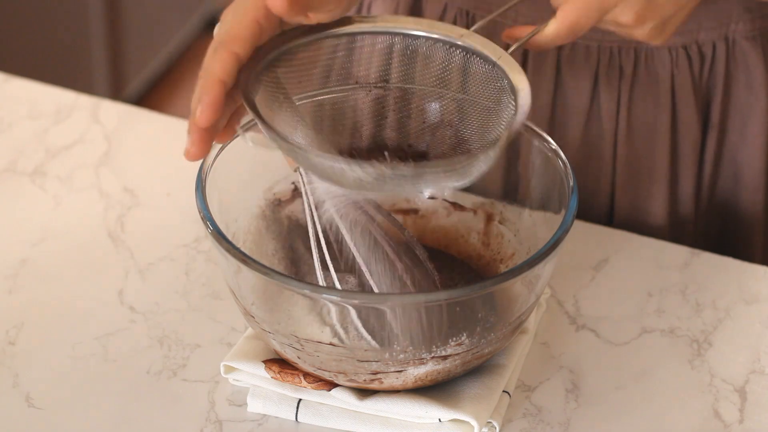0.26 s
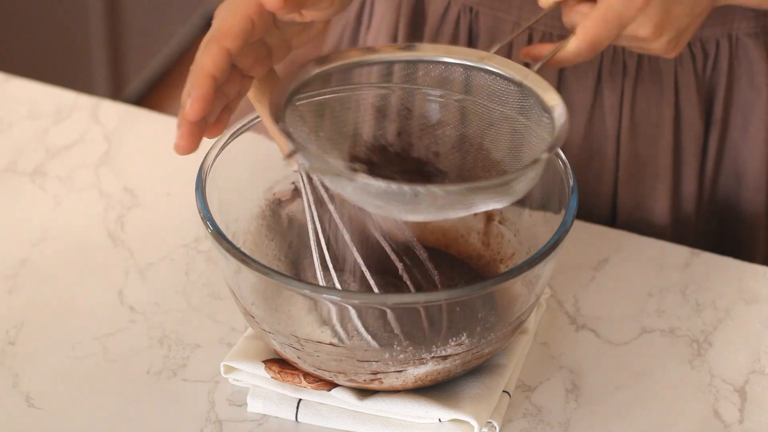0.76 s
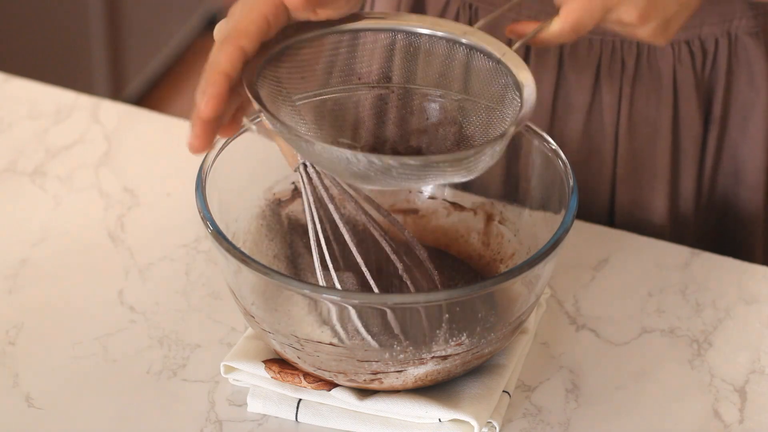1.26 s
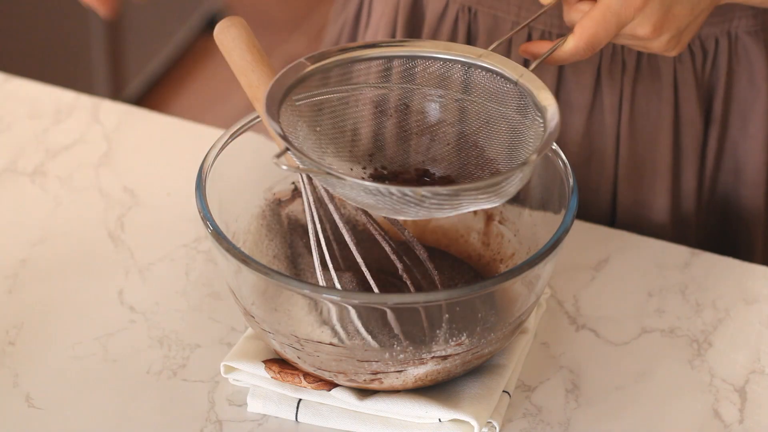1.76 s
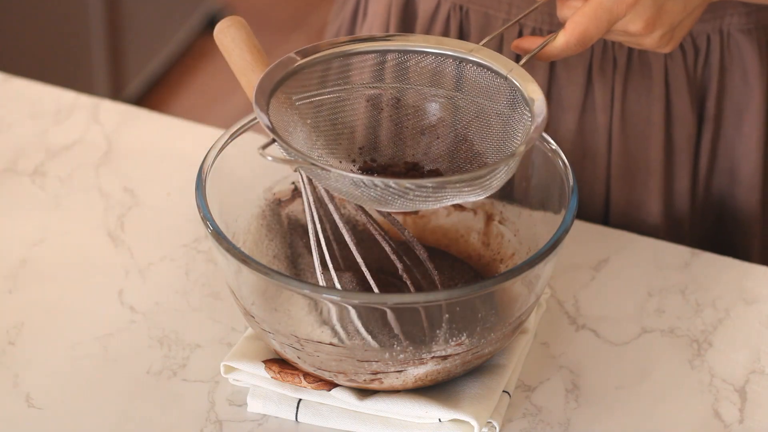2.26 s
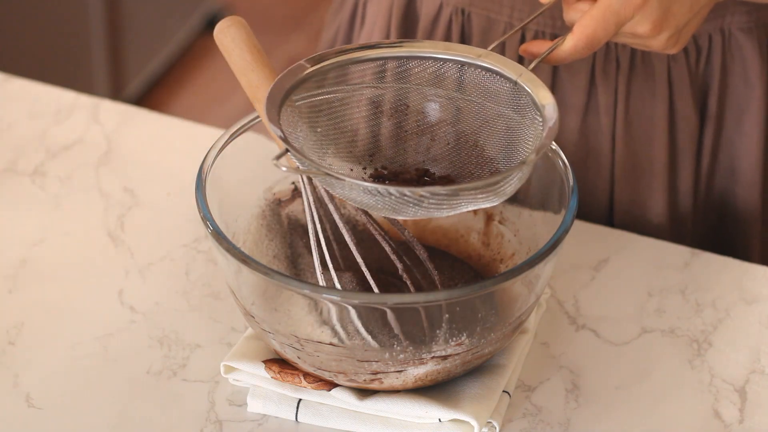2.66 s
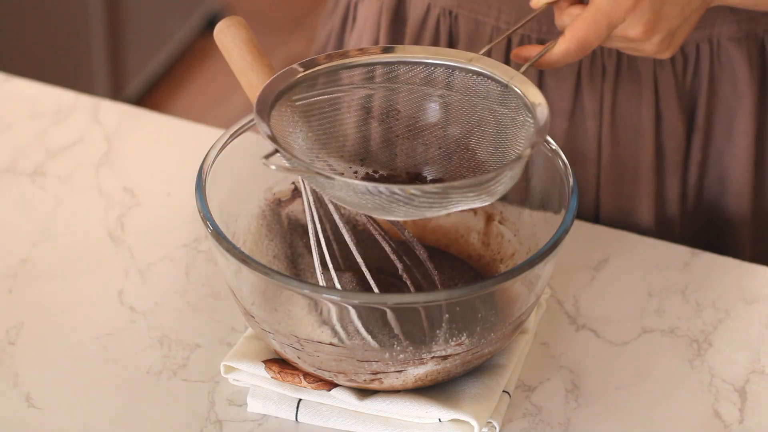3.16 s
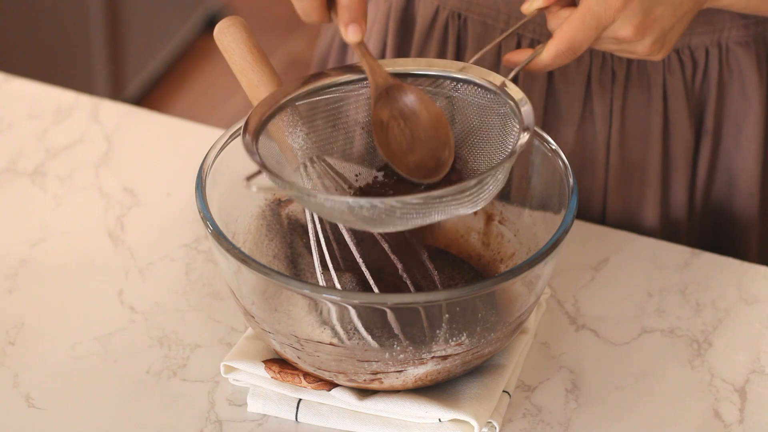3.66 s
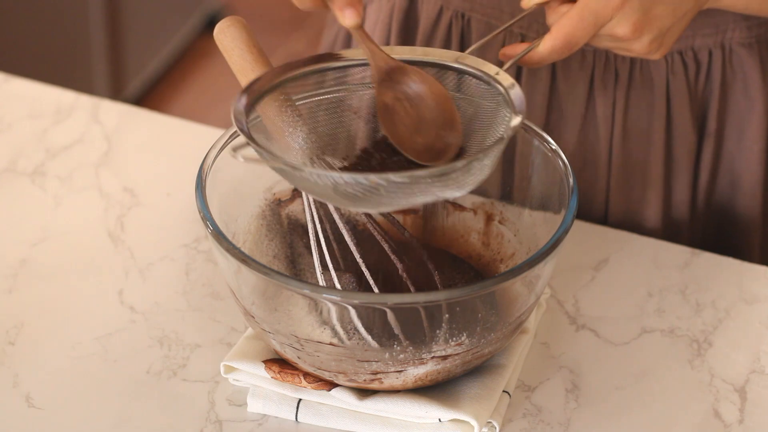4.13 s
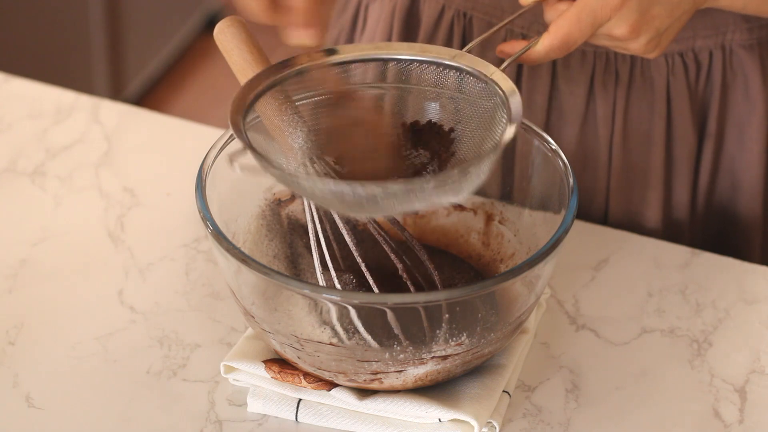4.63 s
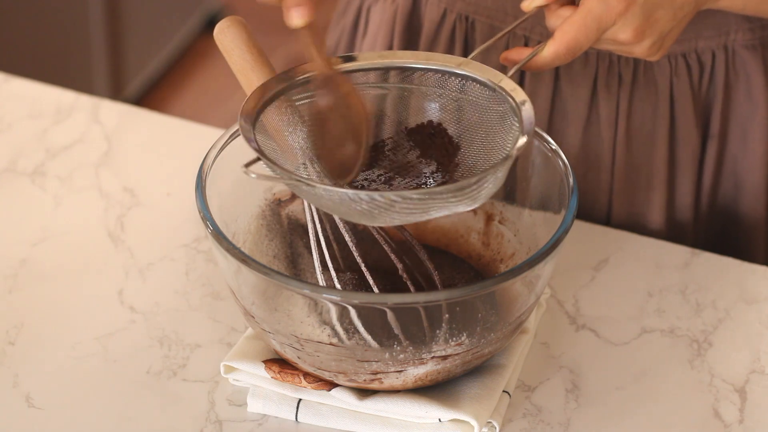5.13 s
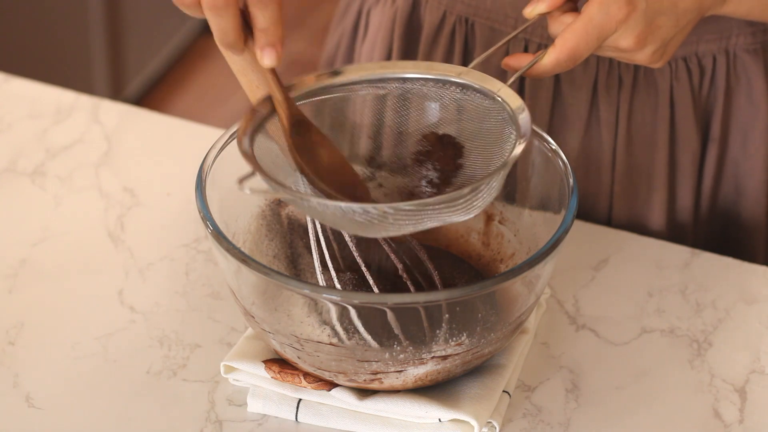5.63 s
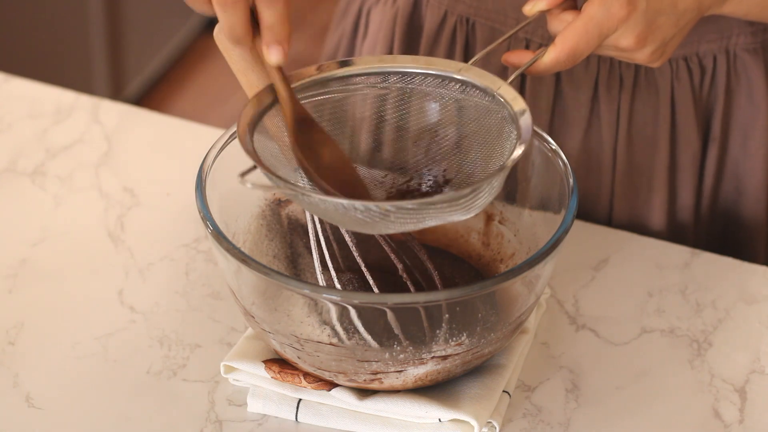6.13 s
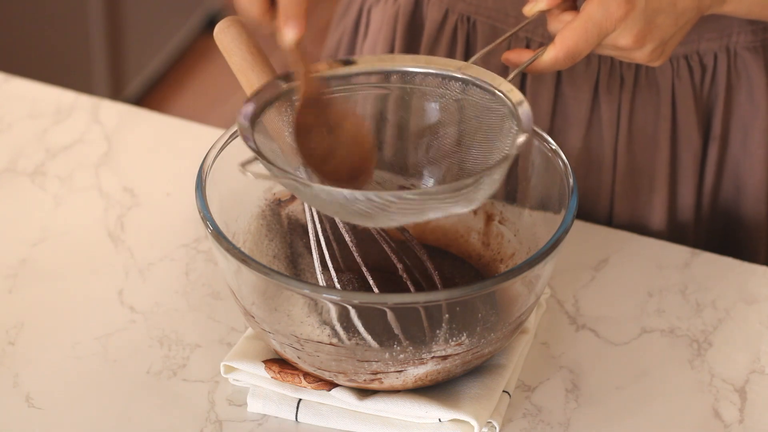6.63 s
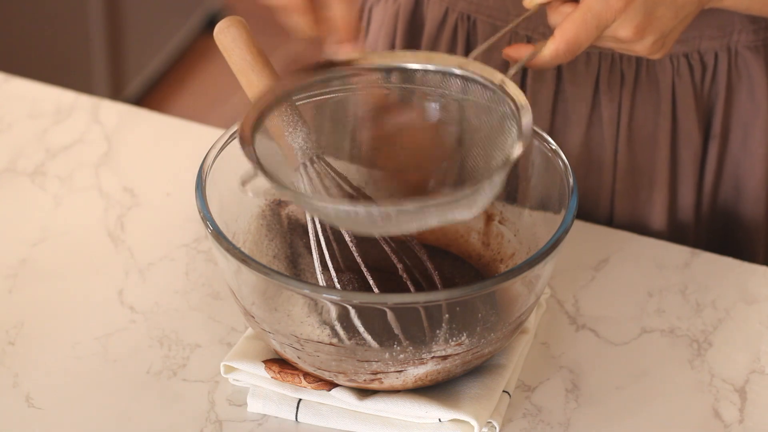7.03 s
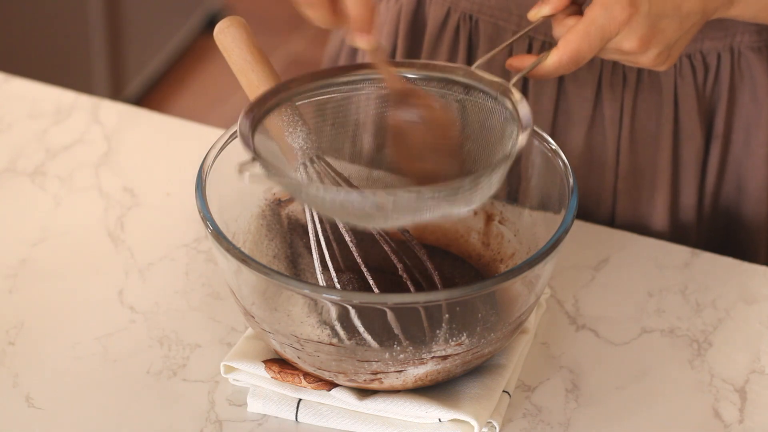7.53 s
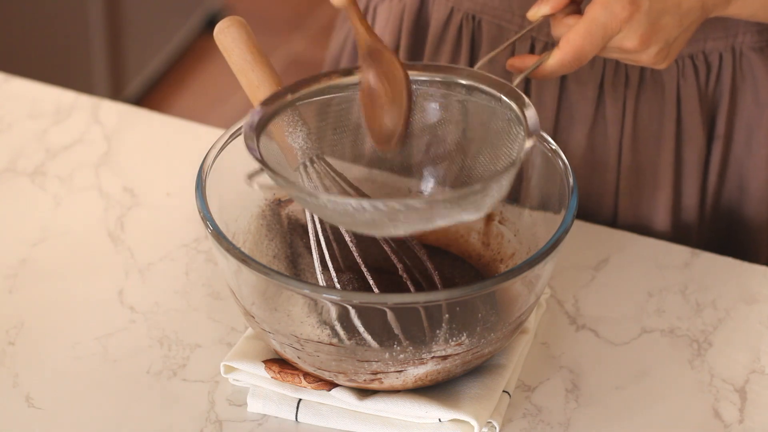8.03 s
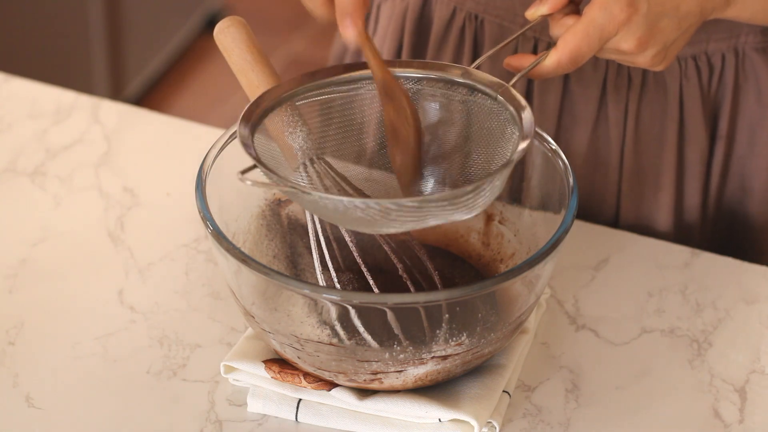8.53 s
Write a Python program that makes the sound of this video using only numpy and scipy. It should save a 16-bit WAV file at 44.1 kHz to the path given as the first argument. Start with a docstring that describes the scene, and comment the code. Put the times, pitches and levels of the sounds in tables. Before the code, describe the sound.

Powder is patted softly through a wire sieve, then a wooden spoon rasps across the mesh in brisk strokes, ending with three sharp knocks.

```python
"""In a kitchen, cocoa is sifted through a wire sieve into a glass bowl, heard slightly from the left by a close pair.
Powder slides over the mesh as a hand pats the sieve; a wooden spoon is dragged off the counter in jerks.
The spoon brushes the wires, then strokes lumps through the mesh: random contacts excite wires, frame and membrane,
and even wire crossings zip. Three knocks fall among the strokes, three more at the end free the powder.
Bursts and resonators make the blows; filtered noise makes the ventilation and the room."""
import sys
import numpy as np
from scipy import signal
from scipy.fft import rfft, irfft, next_fast_len
from scipy.io import wavfile
from scipy.ndimage import map_coordinates

SR = 44100
rng = np.random.default_rng(int(sys.argv[2]) if len(sys.argv) > 2 else 0)


def to_wav(s):
    """Save 16-bit WAV."""
    ch = np.atleast_2d(s).T  # columns
    pcm = np.round(np.clip(ch, -1, 1) * 32767)  # PCM
    wavfile.write(sys.argv[1], SR, pcm.astype(np.int16))


N = 387638
TIME = np.arange(N) / SR


def from_db(db):
    """Amplitude factor for a level in dB."""
    return 10 ** (np.asarray(db) / 20)


def unit(x):
    """Scale to energy 1."""
    return x / np.sqrt(np.sum(x ** 2) + 1e-20)


def rms_one(x):
    """Scale to RMS 1."""
    return x / np.sqrt(np.mean(x ** 2) + 1e-20)


def at_hz(points, hz):
    """Read a curve between its points on a logarithmic frequency axis."""
    points = np.array(points)
    return np.interp(np.log(hz + 1), np.log(points[:, 0]), points[:, 1])


def add(out, s, sound):
    """Mix a sound in at time s."""
    start = max(int(s * SR), 0)
    out[start:start + len(sound)] += sound[:max(N - start, 0)]


def butter(x, hz, kind, order=2):
    """Butterworth filter."""
    return signal.sosfilt(signal.butter(order, hz, kind, fs=SR, output="sos"), x)


def colour(x, spectrum, size=4096):
    """Causal (minimum-phase) filter with the given spectrum."""
    gain = from_db(at_hz(spectrum, np.fft.rfftfreq(size, 1 / SR)))
    cepstrum = irfft(np.log(gain))
    # folding the cepstrum makes the phase minimal
    cepstrum[1:size // 2] *= 2
    cepstrum[size // 2 + 1:] = 0
    impulse = irfft(np.exp(rfft(cepstrum)))
    return signal.fftconvolve(x, impulse)[:len(x)]


def slips(count, per_s, spread_db):
    """Random tiny contacts of either sign; spread_db sets how unequal they are."""
    sizes = from_db(spread_db * np.minimum(rng.exponential(1, count), 4))
    signed = sizes * rng.choice([-1, 1], count)
    return signed * (rng.random(count) < per_s / SR)


def resonate(x, modes, stretch=1):
    """Parallel resonances whose pitches follow the factor stretch."""
    out = 0
    for hz, width_hz, db in modes:
        turn = np.exp(2j * np.pi * np.cumsum(hz * stretch * np.ones(len(x))) / SR)
        r = np.exp(-np.pi * width_hz / SR)
        # shift the mode down to 0 Hz, let it ring, shift it back up
        ringing = turn * signal.lfilter([1], [1, -r], x / turn + 1e-18)
        out = out + from_db(db) * unit(ringing.imag)
    edges = np.mean(stretch) * np.array([0.9 * modes[0][0], 1.037 * modes[-1][0]])
    return rms_one(butter(out, edges, "band", order=4))


def crack(t60, buzz_db, buzz_t60):
    """A sharp contact with a weaker, longer buzz: noise under two exponential decays."""
    t = TIME[:SR // 8]
    decay = from_db(-60 * t / t60) + from_db(buzz_db - 60 * t / buzz_t60)
    return rng.standard_normal(len(t)) * decay


def blow(sound, db):
    """Give a hit the energy of 5 ms of sound at this level."""
    return from_db(db) * unit(sound) * np.sqrt(.005 * SR)


def envelope(t, length, attack_s, release_db_per_s):
    """Gain over the times t: rise, hold to the end of the length, release."""
    return np.clip(t / attack_s, 0, 1) * from_db(-release_db_per_s * np.maximum(t - length, 0))


def swell(t, length):
    """Gain over the times t: one rounded swell that rises a little faster than it falls."""
    return np.sin(np.pi * np.clip(t / length, 0, 1) ** .8)


def waver(count, hz):
    """Random fluctuation up to the rate hz; spread 1."""
    return rms_one(butter(rng.standard_normal(count), hz, "low"))


def flutter(count):
    """Gain of a light contact that keeps catching and letting go."""
    return from_db(2.5 * waver(count, 50))


def glide(x, speed):
    """Shift all the resonances of a noise by the moving factor speed."""
    return map_coordinates(x, [np.cumsum(speed)], order=3, mode="mirror")


def slip_tone(hz, overtone_db):
    """Nearly regular slips of uneven strength give a rough, wavering tone that follows the rate hz."""
    turns = np.cumsum(hz * (1 + .035 * waver(len(hz), 200))) / SR
    tone = 0
    for k in range(3):
        gain = from_db(overtone_db * k) / np.sqrt(k + 1)
        tone = tone + gain * np.sin(2 * np.pi * (k + 1) * turns)
    return rms_one(tone * flutter(len(hz)))


# ventilation spectrum, relative: (f/Hz, level/dB)
AIR = [(20, 2), (45, 1), (160, 1.5), (300, -3), (600, -8), (3500, -25), (8000, -35.5), (16000, -48.5)]
AIR_DB = -56.5


def air():
    """Steady ventilation noise, mostly low."""
    return from_db(AIR_DB) * rms_one(colour(rng.standard_normal(N), AIR))


MAINS_HZ, MAINS_DB = 102.5, -61


def hum():
    """Mains hum, a single steady sine."""
    return from_db(MAINS_DB) * np.sin(2 * np.pi * MAINS_HZ * TIME)


HISS_DB = -76


def hiss():
    """Faint bright self-noise of one microphone."""
    return from_db(HISS_DB) * rms_one(butter(rng.standard_normal(N), 11000, "high"))


# bumps of the mesh by the patting hand or the arriving spoon: (t/s, thump level/dB, powder level/dB)
PATS = [(0.072, -54, -52), (0.256, -49, -54.5), (0.454, -52, -55), (0.651, -54, -59), (0.849, -69, -51.5),
        (1.051, -74, -49), (1.233, -51, -56.5), (1.435, -49.5, -51.5), (1.626, -71, -57.5),
        (3.64, -45, -70)]
# powder sliding over the wires, relative spectrum: (f/Hz, level/dB)
POWDER = [(2000, -9.5), (2900, -16.5), (3900, -14.5), (5400, -9.5), (6600, -4), (8000, -3.5), (10000, -13),
          (15000, -8)]
# contact on the steel wires, relative spectrum: (f/Hz, level/dB)
TICK = [(800, -20), (2500, -32.5), (4000, -15), (6000, -1), (8000, 3), (10500, -7), (15200, -6.5),
        (16300, -14.5)]
# resonances of the slack mesh before the pitch factor: (f/Hz, width/Hz, relative level/dB)
MEMBRANE = [(414, 64, -19), (627, 52, 18), (803, 316, 21), (1068, 130, 14)]
# powder trickles around each pat, and each pat gives a dull thud
TRICKLE_DB, TRICKLE_S, THUD_DB = -60, 0.24, -46


def sifting(gather_s=0.026, stop_s=.005, rebound_s=0.039, rebound_width_s=0.01, rebound_db=-7):
    """Powder gathers speed across the wires, stops at the tick of each pat, and slides back a moment later."""
    out, flow = np.zeros(N), np.zeros(N)
    for s, thump_db, powder_db in PATS:
        contact = crack(t60=0.0079, buzz_db=-14, buzz_t60=0.039)
        tick = blow(colour(contact, TICK), powder_db)
        thump = blow(resonate(contact, MEMBRANE, stretch=0.87), thump_db)
        add(out, s, tick + thump)
        thud = butter(crack(t60=0.032, buzz_db=-16, buzz_t60=0.047), [35, 190], "band")
        add(out, s, blow(thud, THUD_DB))
        t = TIME - s
        slide = np.exp(np.minimum(t / gather_s, -t / stop_s))
        rebound = from_db(rebound_db) * np.exp(-((t - rebound_s) / rebound_width_s) ** 2)
        trickle = from_db(TRICKLE_DB) * swell(t + TRICKLE_S / 2, TRICKLE_S)
        flow += from_db(powder_db) * (slide + rebound) + trickle
    powder = rms_one(colour(slips(N, per_s=5400, spread_db=0.0), POWDER))
    return out + flow * flutter(N) * powder


# the spoon is dragged off the counter in jerks:
# (t/s, length/s, body level/dB, body pitch factor, clatter level/dB, clatter pitch factor)
JERKS = [(2.654, 0.043, -51, 1.13, -57.5, 0.94), (2.777, 0.1, -39.5, 1.022, -45, 1),
         (2.796, 0.0061, -32, 1.016, -34.5, 1.05), (2.868, 0.029, -27, 1.04, -37, 1.05),
         (2.9, 0.018, -30, 0.876, -44.5, 1.29)]
# resonances of the spoon on the counter before the pitch factor: (f/Hz, width/Hz, relative level/dB)
COUNTER = [(504, 110, 0), (700, 110, 1.5), (985, 150, 6.5)]
# its higher clatter before the pitch factor: (f/Hz, width/Hz, relative level/dB)
CLATTER = [(1610, 130, 4), (1965, 270, 9), (2720, 100, -8)]
# dull low groans, as of a flexing handle: (t/s, length/s, mean f/Hz, level/dB)
BUMPS = [(2.667, 0.068, 341, -46.5), (3.929, 0.095, 286, -51.5), (3.972, 0.076, 138, -45.5),
         (4.052, 0.026, 195, -45.5)]
# a jerk builds up over a share of its length, then dies away past its end
JERK_ATTACK_SHARE, JERK_RELEASE_DB_PER_S = 0.38, 450
# a faint low ring that swells slowly
LOW_RING_START_S, LOW_RING_S, LOW_RING_DB, LOW_RING_HZ = 2.176, 1, -52, 260.4


def handling(hiss_db=-27):
    """Wood stutters and clatters over the counter; the handle passes on dull groans and a low ring."""
    out, t = np.zeros(N), TIME[:SR // 4]
    for s, length, body_db, pitch, clatter_db, clatter_pitch in JERKS:
        stutter = slips(len(t), per_s=1200, spread_db=-0.5)
        scrape_hiss = from_db(hiss_db) * rms_one(butter(stutter, [3500, 6000], "band"))
        body = from_db(body_db) * (resonate(stutter, COUNTER, pitch) + scrape_hiss)
        clatter = from_db(clatter_db) * resonate(stutter, CLATTER, clatter_pitch)
        jerk = envelope(t, length, JERK_ATTACK_SHARE * length, JERK_RELEASE_DB_PER_S)
        add(out, s, (body + clatter) * jerk)
    for s, length, hz, db in BUMPS:
        wobble = 1 + .08 * waver(len(t), 60)
        add(out, s, from_db(db) * swell(t, length) * slip_tone(hz * wobble, overtone_db=-23))
    rise = envelope(TIME - LOW_RING_START_S, LOW_RING_S, attack_s=1.0, release_db_per_s=83)
    return out + from_db(LOW_RING_DB) * rise * np.sin(2 * np.pi * LOW_RING_HZ * TIME)


# light brushes against the wires: (t/s, length/s, level/dB, pitch factor)
BRUSHES = [(3.127, 0.19, -56.5, 1.21), (3.205, .16, -54.5, .96), (3.34, 0.11, -55, 0.99),
           (3.61, 0.28, -62, 1.1), (5.685, 0.12, -52.5, 0.99)]
# resonances of the lightly brushed wires before the pitch factor: (f/Hz, width/Hz, relative level/dB)
RUSTLE = [(3040, 220, -11), (6770, 370, 5), (7600, 970, -5), (13500, 2500, 2)]


def brushing():
    """A light touch sliding over the wires makes them rustle unevenly, at a pitch that depends on the place."""
    out, t = np.zeros(N), TIME[:SR // 3]
    for s, length, db, pitch in BRUSHES:
        touch = from_db(db) * swell(t, length) ** 2 * flutter(len(t))
        add(out, s, touch * resonate(slips(len(t), per_s=3700, spread_db=0.0), RUSTLE, pitch))
    return out


# steel frame of the sieve, relative spectrum: (f/Hz, level/dB)
FRAME = [(180, -1), (850, -4), (1300, 10.5), (1550, -0.5), (2050, 8), (2600, 1.5), (3200, -1), (4200, 1),
         (8000, -22.5)]


def tap(tick_db, membrane_db):
    """A landing or a catch ticks on the wires and frame and thumps the mesh."""
    contact = crack(t60=.009, buzz_db=-13, buzz_t60=.035)
    tick = blow(colour(contact, TICK), tick_db) + blow(colour(contact, FRAME), tick_db - 20.5)
    return tick + blow(resonate(contact, MEMBRANE, stretch=1.055), membrane_db)


# spoon strokes over the mesh: (touch t/s, time to the crest/s, time to the lift/s,
# landing tick level/dB, wire level/dB, membrane level/dB, mesh pitch factor)
STROKES = [(3.786, 0.046, 0.071, -66, -30.5, -35.5, 1.45), (4.141, 0.046, 0.13, -45, -32, -31, 1.04),
           (4.247, 0.0069, 0.087, -55.5, -40, -41.5, 1.88), (4.489, 0.051, 0.17, -40, -25.5, -31, 1.075),
           (4.808, 0.036, 0.14, -32.5, -24, -34.5, 1.06), (5.071, 0.058, .16, -24.5, -26, -34.5, 1.13),
           (5.376, 0.043, 0.086, -34.5, -21.5, -36, 1.22), (5.78, 0.025, 0.042, -34, -14, -35, 1.9),
           (5.996, 0.031, 0.12, -27, -25.5, -35, 0.75), (6.07, 0.0042, 0.014, -14, -19, -26.5, 2.06),
           (6.236, 0.057, 0.088, -34, -20, -46.5, 1.1), (6.498, 0.031, 0.084, -25.5, -25, -31.5, 0.91),
           (6.708, 0.032, 0.08, -30.5, -26, -35, 0.995), (6.967, 0.011, 0.097, -24, -27.5, -32.5, 1),
           (7.208, 0.029, 0.077, -25.5, -25, -26.5, 1.145), (7.412, 0.049, 0.075, -22.5, -23, -23.5, 1.01),
           (7.622, 0.043, 0.074, -37, -28.5, -29.5, 1.12), (7.86, 0.025, 0.067, -29.5, -26, -31.5, 1.05),
           (8.047, 0.036, 0.08, -23, -21.5, -34.5, 1.06)]
# rubbed wires, relative spectrum: (f/Hz, level/dB)
WIRES = [(1000, -56), (2500, -4.5), (3600, -12.5), (5000, -2), (6300, 3.5), (8200, 7.5), (11000, -1),
         (15000, 2)]
# a stroke swells to its crest, eases off while it slides, and dies when the spoon lifts
SWELL_DB_PER_S, EASE_DB_PER_S, RELEASE_DB_PER_S = 488, 105.5, 493
# past the crest the mesh drumming also fades on its own
MEMBRANE_FADE_DB_PER_S = 37
# the spoon's pressure wavers: spread and top rate
JUDDER_DB, JUDDER_HZ = 1.6, 75
# frame relative to the wires; landing thump relative to the stroke's membrane level
FRAME_DB, THUMP_DB = -12, -28
# the mesh slackens around the crest: time scale, and the share its pitch goes from above to below
SAG_S, SAG = 0.061, 0.04
# the wires sound lower the harder the spoon presses: share between no and full pressure
WIRE_SAG = .16
# ring time of the short modes of the mesh
WEAVE_T60_S = .011
# blows on the open mesh radiate little below this; the rasp reaches an octave lower
SIEVE_LOW_HZ = 254


def strokes(frame_follows=0.72, membrane_follows=0.76):
    """The spoon trips over the wires; the mesh hisses and drums, its pitch sinking as it slackens."""
    out, t = np.zeros(N), TIME[:SR // 3]
    for s, crest, lift, tick_db, wire_db, membrane_db, pitch in STROKES:
        past_crest = np.maximum(t - crest, 0)
        pressure_db = -SWELL_DB_PER_S * np.maximum(crest - t, 0) - EASE_DB_PER_S * past_crest
        pressure_db = pressure_db - RELEASE_DB_PER_S * np.maximum(t - lift, 0)
        judder_db = JUDDER_DB * waver(len(t), JUDDER_HZ)
        # countless fine contacts; the resonances wander as the spoon travels
        grit = slips(len(t), per_s=14000, spread_db=2.5)
        wander = 1 + .05 * waver(len(t), 20)
        wire_speed = wander * (1 - WIRE_SAG * (from_db(pressure_db) - .5))
        wire_gain = from_db(wire_db + pressure_db + judder_db)
        wires = wire_gain * rms_one(glide(colour(grit, WIRES), wire_speed))
        # each stroke adds its own crowd of short mesh modes to the frame
        weave = unit(rng.standard_normal(len(t)) * from_db(-60 * t / WEAVE_T60_S))
        rasp = butter(grit + signal.fftconvolve(grit, weave)[:len(t)], SIEVE_LOW_HZ / 2, "high")
        frame_gain = from_db(wire_db + FRAME_DB + frame_follows * pressure_db + judder_db)
        frame = frame_gain * rms_one(glide(colour(rasp, FRAME), wander))
        # sparser uneven crossings drum on the slackening mesh
        stretch = pitch * wander * (1 - SAG * np.tanh((t - crest) / SAG_S))
        drum_db = membrane_db + membrane_follows * pressure_db - MEMBRANE_FADE_DB_PER_S * past_crest
        crossings = slips(len(t), per_s=1100, spread_db=2.5)
        membrane = from_db(drum_db + judder_db) * resonate(crossings, MEMBRANE, stretch)
        add(out, s, wires + frame + membrane)
        add(out, s, tap(tick_db, membrane_db + THUMP_DB))
    return out


# the spoon lands firmly, catches on the mesh or cracks a lump: (t/s, tick level/dB, membrane level/dB)
CATCHES = [(4.142, -38.5, -31.5), (4.181, -51, -24.5), (4.2, -52, -31.5), (4.528, -20, -35),
           (7.2355, -49, -16), (7.251, -27, -24), (7.46, -27, -20.5), (7.65, -30, -29.5)]


def lumps():
    """The spoon lands firmly, catches or cracks a lump, each time a tick on the steel and a thump of the mesh."""
    out = np.zeros(N)
    for s, tick_db, membrane_db in CATCHES:
        add(out, s, tap(tick_db, membrane_db))
    return out


# the spoon skips evenly from wire to wire:
# (t/s, length/s, start crossing f/Hz, end crossing f/Hz, level/dB, level change per overtone/dB)
ZIPS = [(4.528, 0.037, 585, 361, -29, -15), (4.84, 0.051, 726, 401, -23, -7.5),
        (5.142, 0.038, 382, 340, -31.5, -1), (5.99, 0.046, 708, 548, -32.5, -21),
        (6.078, 0.039, 562, 407, -28, -22), (6.285, 0.061, 640, 452, -29.5, -21),
        (6.516, 0.092, 477, 603, -34, -8), (6.72, 0.094, 478, 640, -28.5, -20),
        (7.225, 0.0278, 485, 310, -26.5, 0), (7.446, 0.062, 587, 708, -31.5, 4),
        (7.645, 0.05, 550, 780, -29.5, -8.5), (7.685, 0.03, 514, 358, -34, 2),
        (8.095, 0.039, 1017, 1217, -30, -23)]


def zips():
    """Even wire crossings give a short tone that glides with the spoon's speed."""
    out, t = np.zeros(N), TIME[:SR // 8]
    for s, length, start_hz, end_hz, db, overtone_db in ZIPS:
        rate_hz = start_hz * (end_hz / start_hz) ** np.minimum(t / length, 1)
        add(out, s, from_db(db) * swell(t, length) * slip_tone(rate_hz, overtone_db))
    return out


# modes of the knocked spoon before the tilt: (f/Hz, relative level/dB, t60/s)
WOOD = [(389, -3, 0.055), (516, 2, 0.0081), (834, -8.5, 0.068), (1233, -5, 0.067)]


def struck(modes, tilt_db):
    """One blow on decaying modes of alternating sign: a harder contact favours the higher ones."""
    t, rings = TIME[:SR // 4], 0
    for k, (hz, db, t60) in enumerate(modes):
        level_db = db + tilt_db * np.log2(hz / modes[0][0]) - 60 * t / t60
        rings = rings + (-1) ** k * from_db(level_db) * np.sin(2 * np.pi * hz * t)
    return butter(rings, 220, "high")


# hard knocks of the spoon on the sieve:
# (t/s, tick level/dB, frame level/dB, wood level/dB, wood tilt/dB per octave, ring level/dB)
KNOCKS = [(5.7851, -13.5, -25.5, -50, -18, -30.5), (6.068, -18.5, -22.5, -29, -39, -29),
          (6.3191, -12.5, -23, -22.5, 2.5, -33), (8.417, -6.5, -19.5, -21.5, -1, -61),
          (8.606, -7.5, -23, -18.5, -9.5, -68), (8.7845, -12.5, -31.5, -27.5, 1, -55)]
# clusters of close modes in the steel rim and wires: (f/Hz, width/Hz, relative level/dB)
RIM = [(503, 250, -1.5), (1375, 91, -1), (3050, 110, -12), (3510, 610, -6), (5490, 810, -10.5),
       (7350, 580, -2)]
RIM_T60_S = 0.4
# the loose mesh rattles on: level relative to the tick setting, decay
RATTLE_DB, RATTLE_T60_S = -33, 0.36


def knocks():
    """Hard blows crack on the steel, sound the wooden spoon and leave the rim ringing and the mesh rattling."""
    out, t = np.zeros(N), TIME[:SR // 2]
    for s, tick_db, frame_db, wood_db, tilt_db, ring_db in KNOCKS:
        contact = crack(t60=.009, buzz_db=-13.5, buzz_t60=.05)
        add(out, s, blow(colour(contact, TICK), tick_db))
        frame = colour(crack(t60=0.026, buzz_db=-24.0, buzz_t60=.06), FRAME)
        add(out, s, blow(frame, frame_db))
        add(out, s, blow(struck(WOOD, tilt_db), wood_db))
        ring = resonate(rng.standard_normal(len(t)), RIM)
        add(out, s, from_db(ring_db - 60 * t / RIM_T60_S) * ring)
        rattle = rms_one(butter(rng.standard_normal(len(t)), [1100, 8000], "band", order=1))
        add(out, s, from_db(tick_db + RATTLE_DB - 60 * t / RATTLE_T60_S) * rattle)
    return out


# kitchen reverberation: (f/Hz, t60/s)
ROOM_T60 = [(200, 0.29), (1000, 0.16), (3000, 0.3), (7000, 0.15), (15000, 0.087)]


def kitchen(x, gap_s=0.00036):
    """Diffuse reflections: noise that dies away band by band, starting after a short gap."""
    t, tail = TIME[:SR // 2], 0
    edges = np.geomspace(150, 17000, 9)
    for low, high in zip(edges, edges[1:]):
        band = butter(rng.standard_normal(len(t)), [low, high], "band")
        tail = tail + band * from_db(-60 * t / at_hz(ROOM_T60, np.sqrt(low * high)))
    return signal.fftconvolve(x, unit(tail * (t > gap_s)))[:N]


PORT_LAG_S = 5e-5
# reverberation common to both ports; reflections and air of each port's own
WET_DB, SPREAD_DB, SPREAD_ABOVE_HZ, AIR_SPREAD_DB = -12, -11.5, 4100, -12.5


def scene():
    """All sources in the kitchen, heard by two closely spaced microphone ports."""
    hits = butter(lumps() + knocks(), SIEVE_LOW_HZ, "high")
    direct = sifting() + handling() + brushing() + strokes() + zips() + hits
    near = direct + from_db(WET_DB) * kitchen(direct)
    # the sound reaches the right port a little later
    size = next_fast_len(N + SR // 10)
    delay = np.exp(-2j * np.pi * np.fft.rfftfreq(size, 1 / SR) * PORT_LAG_S)
    late = irfft(rfft(near, size) * delay, size)[:N]
    # the higher reflections and part of the air differ between the ports
    treble = butter(direct, SPREAD_ABOVE_HZ, "high", order=1)
    diffuse = []
    for port in range(2):
        reflections = from_db(SPREAD_DB) * kitchen(treble)
        diffuse.append(reflections + from_db(AIR_SPREAD_DB) * air() + hiss())
    return np.array([near, late]) + np.array(diffuse) + air() + hum()


CUTOFF_HZ = 15700


def record(dry):
    """The input adds a small constant offset, clips peaks beyond full scale, and cuts the top."""
    clipped = np.clip(dry + .0183, -1, 1)
    # order 10, 0.1 dB ripple, 80 dB stopband
    lowpass = signal.ellip(10, .1, 80, CUTOFF_HZ, fs=SR, output="sos")
    return signal.sosfilt(lowpass, clipped)


dry = scene()
out = record(dry)
to_wav(out)
```